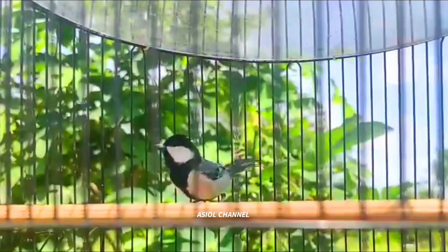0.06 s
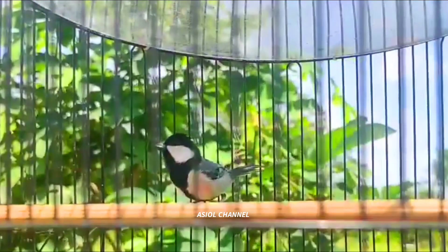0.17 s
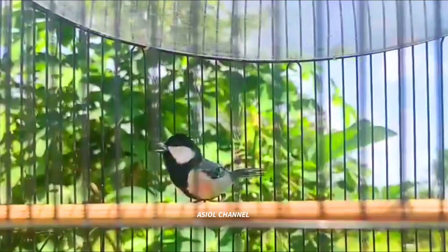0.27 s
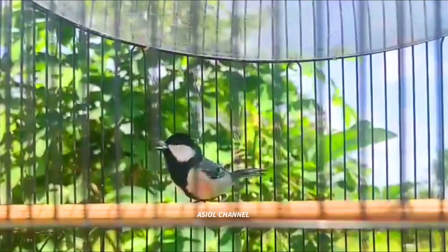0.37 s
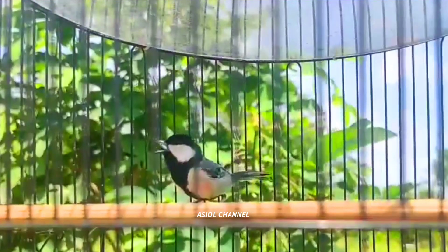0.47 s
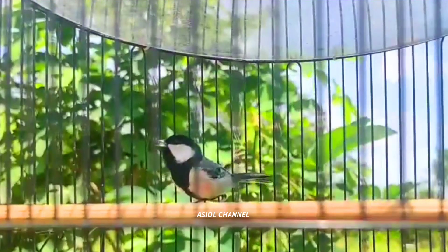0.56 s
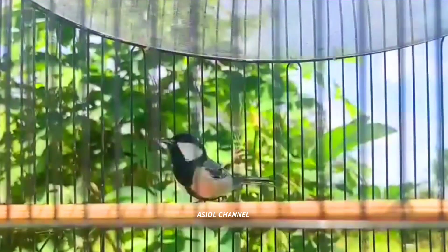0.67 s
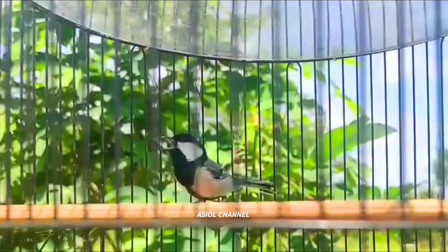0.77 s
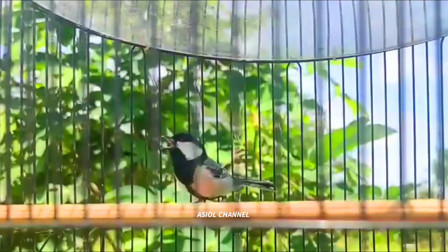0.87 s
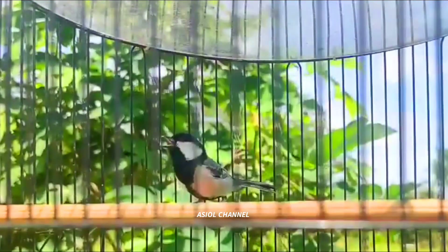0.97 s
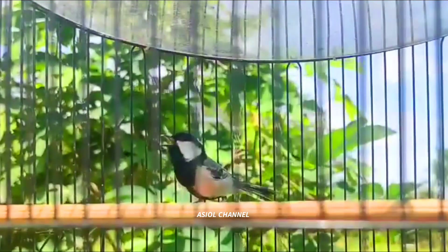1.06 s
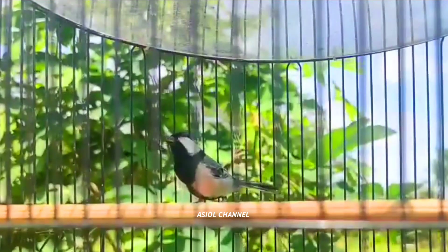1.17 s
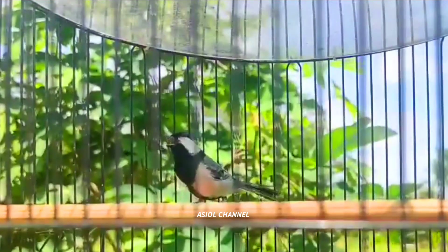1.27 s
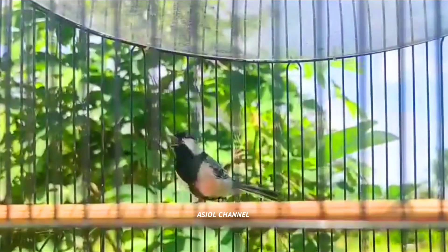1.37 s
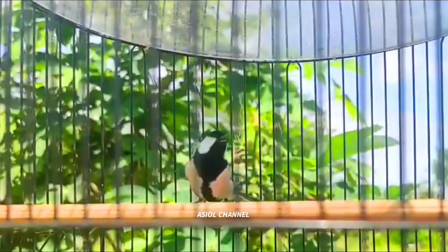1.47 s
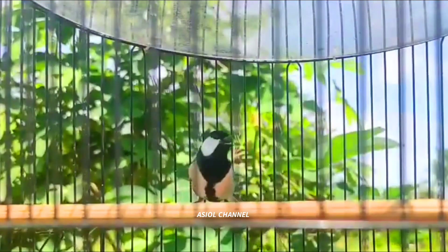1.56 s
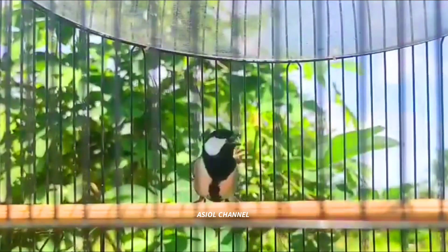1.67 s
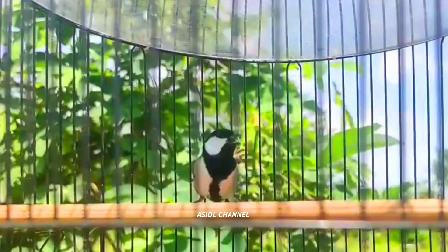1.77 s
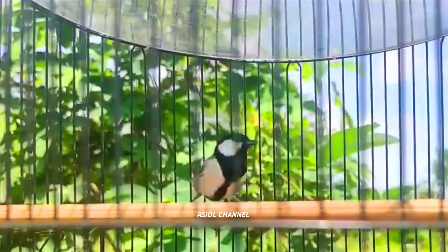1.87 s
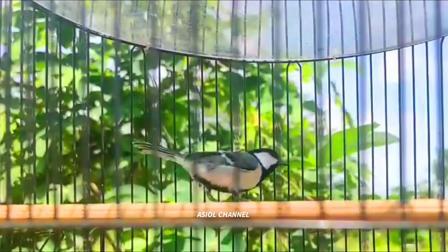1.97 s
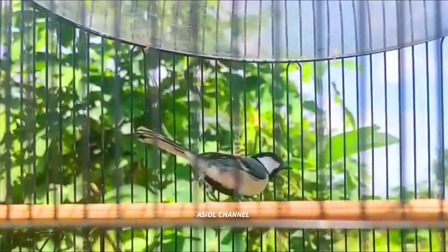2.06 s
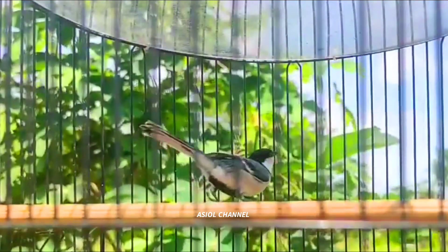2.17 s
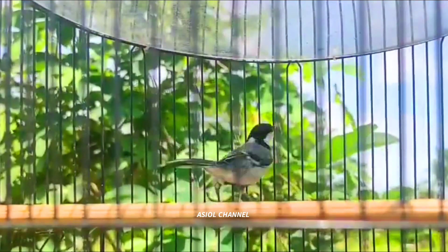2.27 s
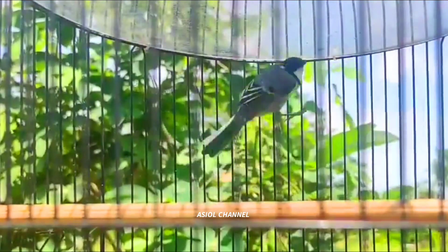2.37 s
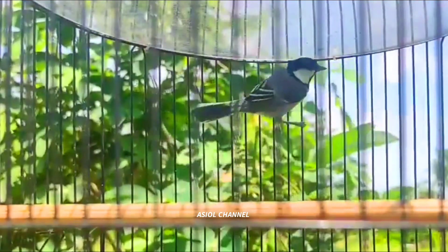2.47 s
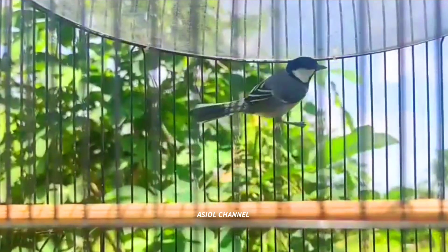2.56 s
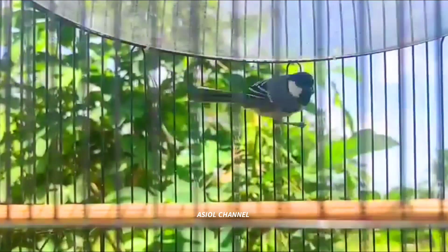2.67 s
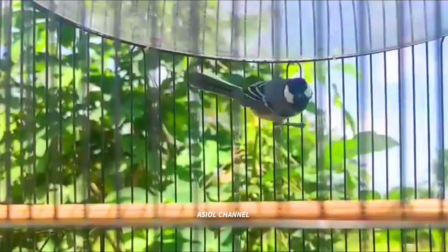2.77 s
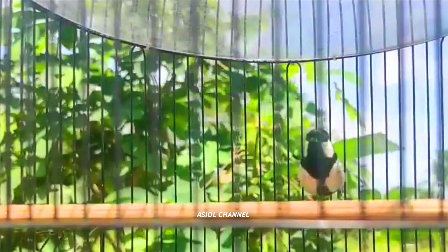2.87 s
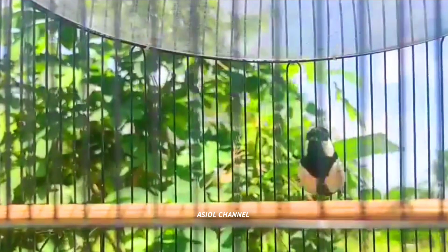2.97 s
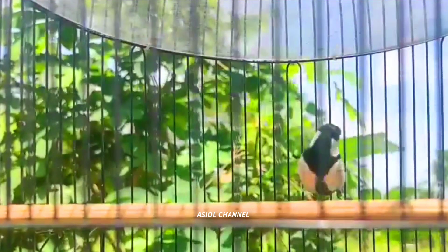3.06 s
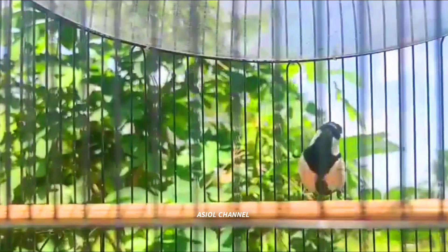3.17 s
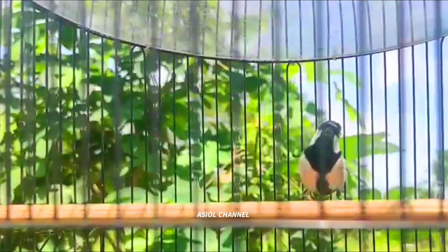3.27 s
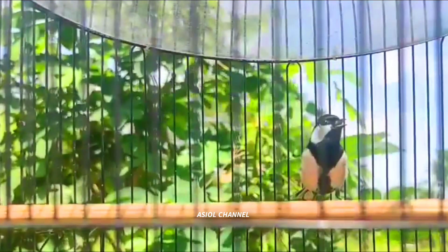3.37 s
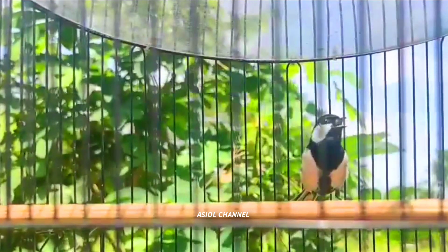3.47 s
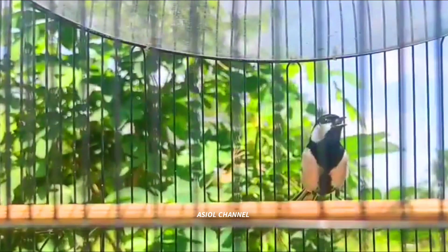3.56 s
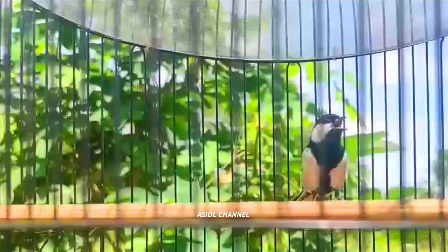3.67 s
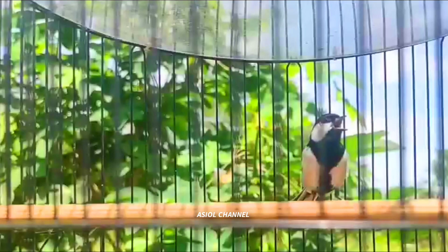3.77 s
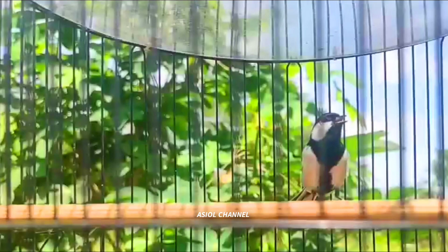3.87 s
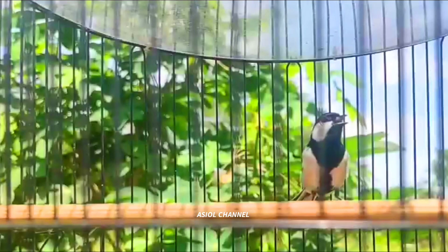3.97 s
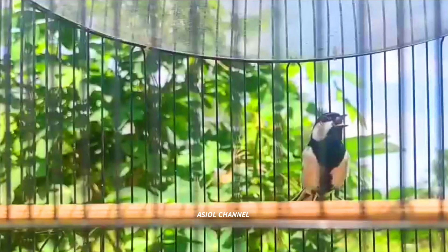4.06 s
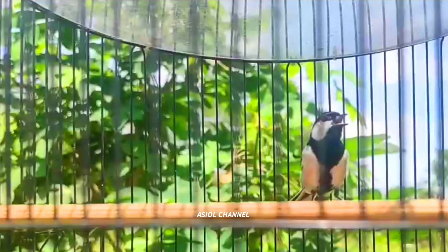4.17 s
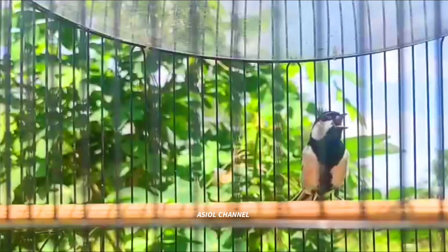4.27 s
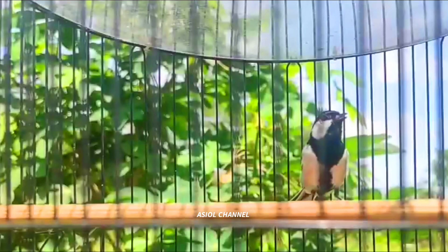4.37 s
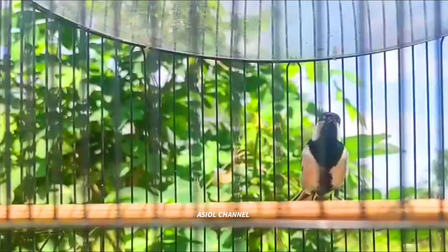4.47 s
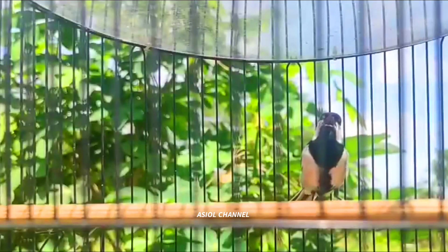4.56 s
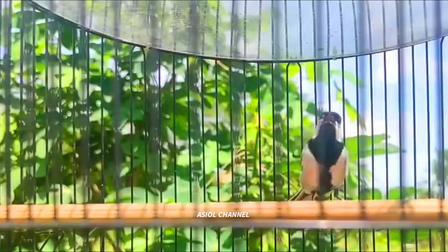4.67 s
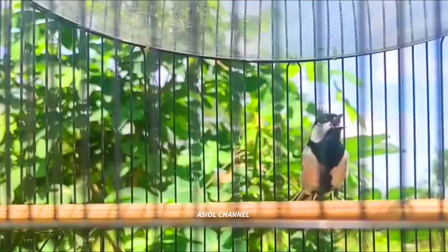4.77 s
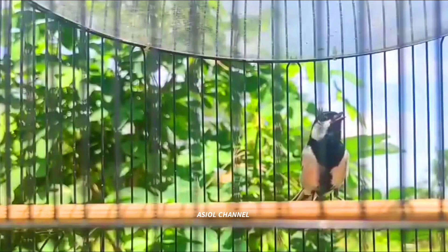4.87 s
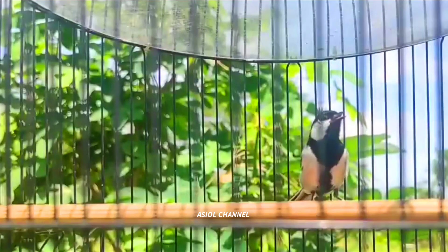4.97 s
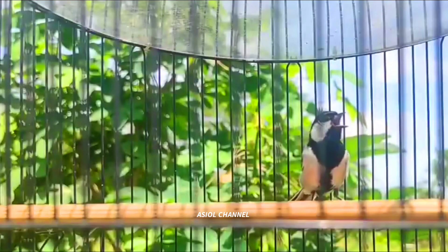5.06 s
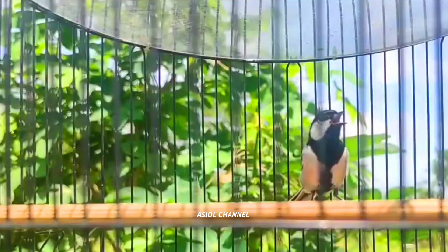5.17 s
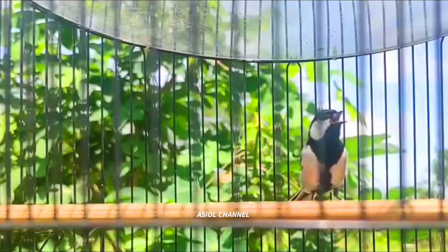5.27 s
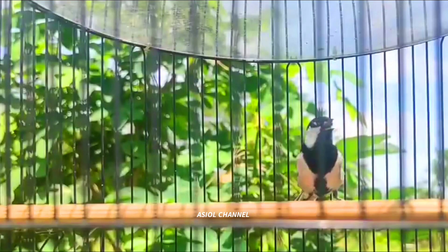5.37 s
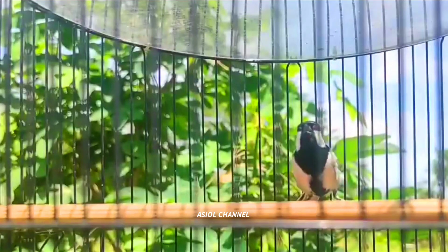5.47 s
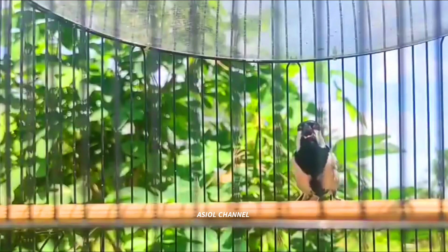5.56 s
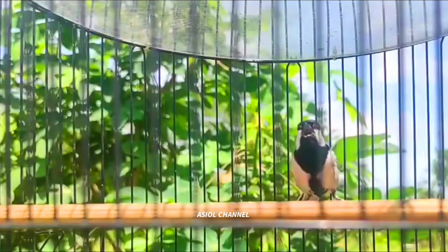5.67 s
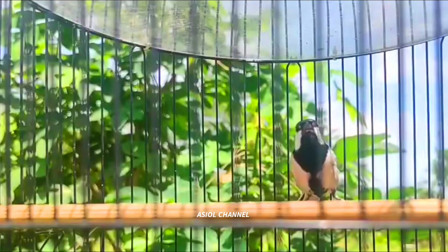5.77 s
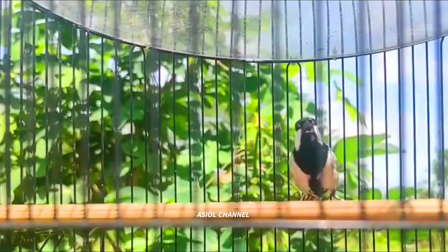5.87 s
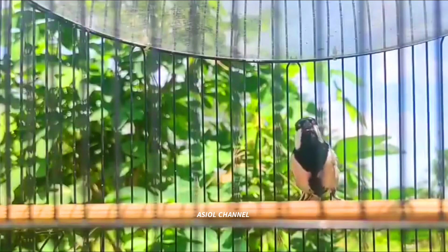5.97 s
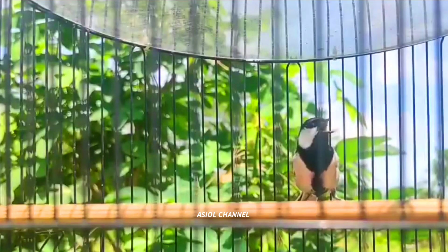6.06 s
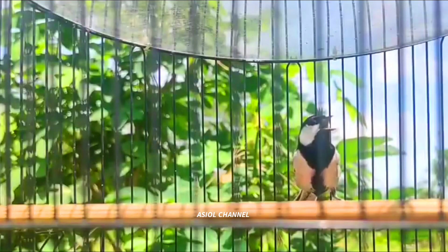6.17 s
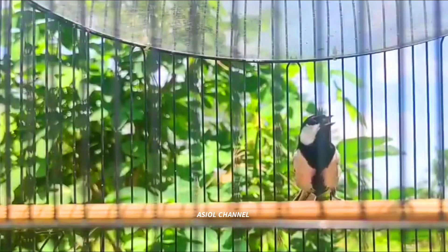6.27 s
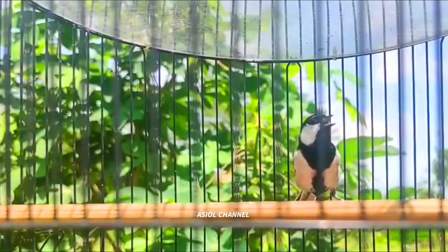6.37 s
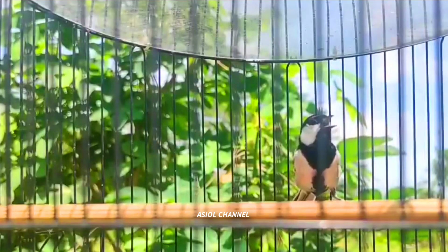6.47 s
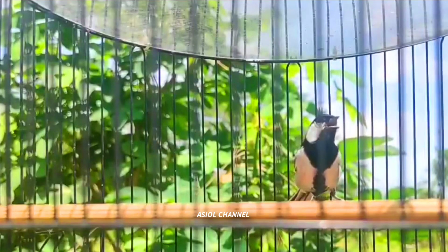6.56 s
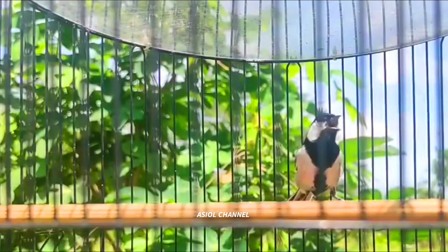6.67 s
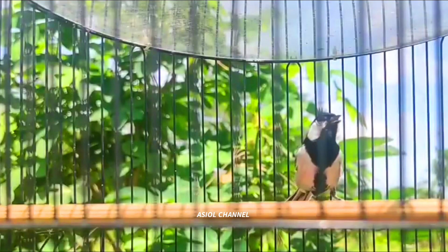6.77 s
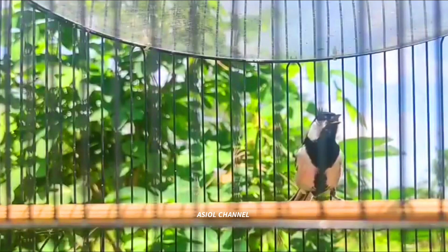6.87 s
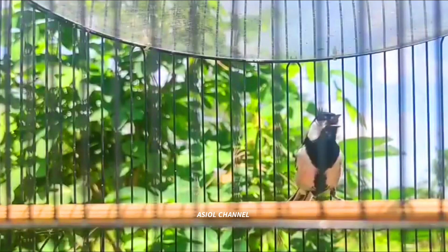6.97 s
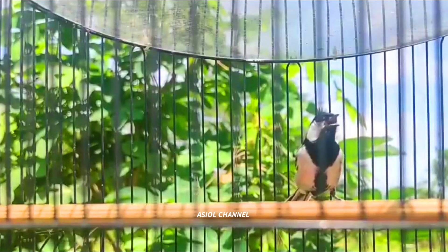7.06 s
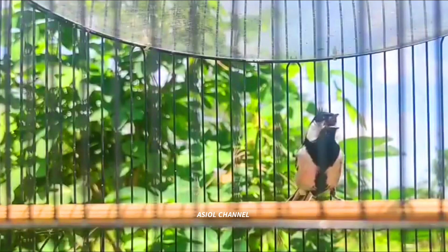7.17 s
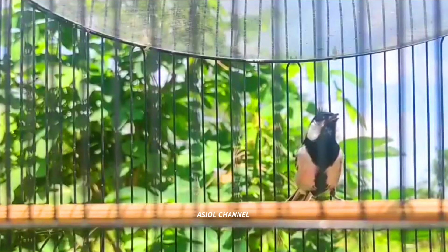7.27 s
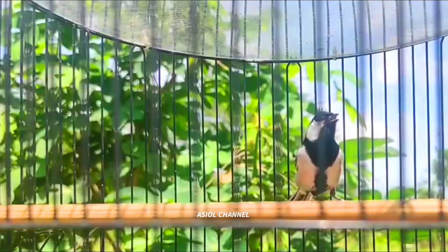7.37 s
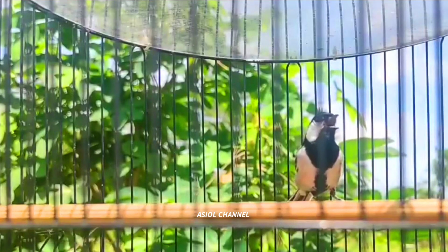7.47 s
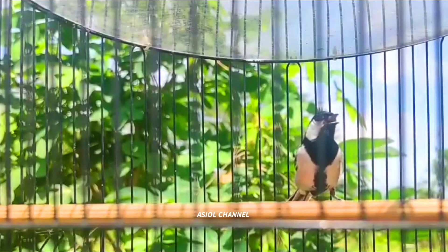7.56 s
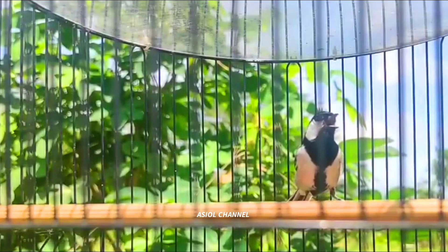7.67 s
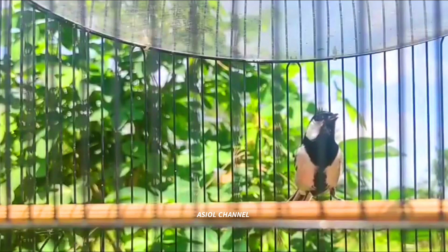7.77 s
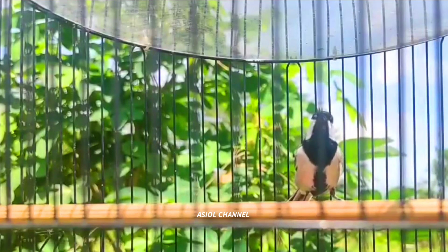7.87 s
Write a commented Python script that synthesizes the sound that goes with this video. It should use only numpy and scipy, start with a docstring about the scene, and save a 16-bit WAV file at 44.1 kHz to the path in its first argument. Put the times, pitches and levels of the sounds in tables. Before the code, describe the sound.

Close, bright tit song repeats a raspy upsweep, dipping whistle and high arched whistle, pausing midway for a quick hop in its wire cage.

```python
"""Caged tit singing in a quiet garden

Close to a stereo microphone, a tit in a wire cage sings two bursts of a three-note motif: a raspy upsweep,
a dipping whistle and a high arched whistle, each a gliding tone with weak overtones and filtered noise.
Between the bursts it hops: noise for claws and thud, wavering sines for the faintly ringing wires.
Nearby surfaces scatter a short noise-like tail behind every note; air, rumble and a whine lie far below."""
import sys
import numpy as np
from scipy import signal
from scipy.fft import rfft, irfft, next_fast_len
from scipy.io import wavfile
from scipy.ndimage import uniform_filter1d, minimum_filter1d

SR = 44100
rng = np.random.default_rng(int(sys.argv[2]) if len(sys.argv) > 2 else 0)


def file_out(sig):
    """Save sig as 16-bit WAV at sys.argv[1]."""
    # one column per channel
    cols = np.atleast_2d(sig).T
    # limit, then scale
    lim = np.clip(cols, -1, 1)
    pcm = np.round(lim * 32767).astype(np.int16)
    wavfile.write(sys.argv[1], SR, pcm)


N = 348390
TIME = np.arange(N) / SR
TOP_HZ = 15400  # upper edge of the sound


def undb(db):
    """Decibels to gain."""
    return 10 ** (np.asarray(db) / 20)


def unit(x):
    """Scale to rms 1."""
    return x / np.sqrt(np.mean(x ** 2))


def curve(rows):
    """Join rows of time in seconds and value by straight lines."""
    return np.interp(TIME, *np.transpose(rows))


def gain_at(hz, points):
    """Gain at the given frequencies of a spectrum drawn in Hz and dB."""
    point_hz, db = np.transpose(points)
    return undb(np.interp(np.log(hz + 1), np.log(point_hz), db))


def stereo_noise(points, likeness):
    """Noise coloured by a spectrum, scaled to rms 1, partly shared by the two channels."""
    own, shared = rng.standard_normal((2, N)), rng.standard_normal(N)
    common, size = np.clip(likeness, 0, 1), next_fast_len(N)
    white = np.sqrt(1 - common) * own + np.sqrt(common) * shared
    colour = gain_at(np.fft.rfftfreq(size, 1 / SR), points)
    return unit(irfft(rfft(white, size) * colour, size)[:, :N])


def waver(rate):
    """Smooth random motion of rms 1, averaged twice over 1 / rate seconds."""
    width = max(int(SR / rate), 2)
    smooth = uniform_filter1d(rng.standard_normal(N), width)
    return unit(uniform_filter1d(smooth, width))


# Spectrum of the still garden air. Each row: frequency in Hz, relative density in dB per Hz.
AIR_COLOUR = [(25, -9.5), (80, -10), (155, -3.5), (240, -13), (1000, -18), (3300, -18.5), (5000, -24.5),
              (9000, -22), (13600, -28.5), (15000, -41.5)]
# Level of the air around the microphone. Each row: time in seconds, level in dB.
AIR_LEVEL = [(0, -75.5), (1, -69.5), (2.2, -71), (2.7, -69.5), (3.2, -71), (7.9, -65)]


def still_air():
    """Broad, very quiet noise whose level drifts slowly."""
    return undb(curve(AIR_LEVEL) + 1.0 * waver(6)) * stereo_noise(AIR_COLOUR, 0.2)


# Spectrum of the low outdoor rumble. Each row: frequency in Hz, relative density in dB per Hz.
RUMBLE_COLOUR = [(25, -1), (70, 2), (170, -5.5), (300, -20.5), (800, -28), (3000, -42)]
# Level of the rumble at the microphone. Each row: time in seconds, level in dB.
RUMBLE_LEVEL = [(0, -98.5), (1.2, -69), (1.8, -61.5), (3.2, -73), (5, -65.5), (6, -71.5), (6.9, -64.5),
                (7.9, -65)]


def low_rumble():
    """Low-pitched noise that swells and sinks, with a quick unevenness in level."""
    return undb(curve(RUMBLE_LEVEL) + 2 * waver(44)) * stereo_noise(RUMBLE_COLOUR, 0.19)


# Spectrum of the faint whine. Each row: frequency in Hz, relative density in dB per Hz.
WHINE_COLOUR = [(3150, -50), (3340, -9.5), (3390, 8), (3440, 4.5), (3620, -58)]


def faint_whine():
    """A narrow band of noise, a little weaker over the first two seconds."""
    fade_in = curve([(0, 0.75), (2, 1), (7.9, 1)])
    return undb(-82) * stereo_noise(WHINE_COLOUR, 0.17) * fade_in


# Faint far tones at the opening. Each row: frequency in Hz, rms level in dB.
FAR_TONES = [(813, -90), (1620, -90.5)]


def far_tones():
    """Steady sines that fade out as the song begins."""
    tones = sum(undb(db) * np.sqrt(2) * np.sin(2 * np.pi * hz * TIME) for hz, db in FAR_TONES)
    return tones * curve([(.35, 1), (.6, 0)])


def garden():
    """The quiet place around the cage: air, rumble, whine and far tones."""
    return still_air() + low_rumble() + faint_whine() + far_tones()


# Ringing of the cage wires. Each row: frequency in Hz, relative level in dB.
CAGE_MODES = [(861, 2.5), (930, -6.5), (1340, -9), (1730, 3), (2270, -11), (2780, -7), (3370, -20)]
# Hops across the cage. Each row: start in seconds, scrape of the claws in dB, ring of the cage in dB.
HOPS = [(2.657, -58, -67), (2.714, -83, -61), (2.764, -84, -96), (3.06, -76, -81.5)]


def hops():
    """Claws scrape on the perch; the cage thuds and its loose wires rattle at their modes."""
    scrape_t60_s, thud_t60_s, wires_t60_s = 0.23, 0.43, .6  # times to die by 60 dB
    rise_s, thud_db = 0.0073, 1  # thud relative to the wires
    claws = stereo_noise([(300, 11.5), (2000, -3.5), (7000, 6.0), (13000, 3), (15000, -20)], 0.36)
    thud = stereo_noise([(100, 14), (400, 4.0), (900, 7), (2000, -5), (3200, -18), (6000, -27)], 0.43)
    wires = np.zeros((2, N))
    for hz, db in CAGE_MODES:
        phase = rng.uniform(0, 2 * np.pi, (2, 1))  # its own in each channel
        wires += undb(db) * waver(hz / 10) * np.sin(2 * np.pi * hz * TIME + phase)
    wires = unit(wires)
    out, t = np.zeros((2, N)), TIME[:SR]
    for start, scrape_db, ring_db in HOPS:
        span = slice(int(start * SR), int(start * SR) + SR)
        ring = undb(-60 * t / wires_t60_s) * wires[:, span]
        knock = undb(thud_db - 60 * t / thud_t60_s) * thud[:, span]
        scrape = undb(scrape_db - 60 * t / scrape_t60_s) * claws[:, span]
        out[:, span] += np.minimum(t / rise_s, 1) * (undb(ring_db) * (ring + knock) + scrape)
    return out


def scatter(x, db, t60, delay, treble_db):
    """A dense, dying spray of echoes, different at each channel; the overtones, beamed aside, feed it more."""
    t = TIME[:SR // 2]
    # silent up to the delay, full at twice the delay
    echoes = rng.standard_normal((2, len(t))) * undb(-60 * t / t60) * np.clip(t / delay - 1, 0, 1)
    echoes *= undb(db) / np.sqrt(np.sum(echoes ** 2, axis=1, keepdims=True))
    colour = [(7500, 5), (9300, 6.5), (10300, treble_db), (14000, treble_db), (15000, -9.5)]
    tilt = gain_at(np.fft.rfftfreq(len(t), 1 / SR), colour)
    return signal.fftconvolve(x, irfft(rfft(echoes) * tilt, len(t)), axes=1)[:, :N]


# Turned away from the microphone, the bird lights up the cage more.
# Each row: time in seconds, extra echo in dB.
TURNED_AWAY = [(.4, -1.5), (.9, -5.5), (1.6, 0.5), (1.85, -1), (2.1, -4.5), (3.4, -6), (3.9, -5),
               (7.9, -10)]


def surroundings(voice):
    """Wires and floor of the cage answer at once, the surroundings later and more softly."""
    aside = voice * undb(curve(TURNED_AWAY))
    cage = scatter(aside, db=-17.0, t60=.06, delay=.0035, treble_db=13.5)
    yard = scatter(aside, db=-33, t60=.13, delay=.008, treble_db=7)
    far = scatter(aside, db=-54, t60=1.0, delay=.03, treble_db=-7)
    return cage + yard + far


# How the throat carries the tone: sweeps start faint below its range, arches go hollow above it.
# Each row: frequency in Hz, gain in dB.
THROAT_COLOUR = [(3300, -20.5), (3800, -8.5), (4200, -0.5), (4850, -0.5), (5600, 2), (6850, -1),
                 (7450, -7.5), (8200, -23)]
# What throat and beak let through of the overtones. Each row: frequency in Hz, gain in dB.
OVERTONE_COLOUR = [(6500, 1.5), (8000, 0), (8900, -32.5), (9500, -12.5), (10200, -3.5), (12000, 2),
                   (13300, 3.5), (14200, -0.5), (14900, -34)]
# Where the bird points its beak. Each row: time in seconds, left minus right in dB before each note kind's aim.
FACING = [(.4, -1.5), (1.35, -3), (2, -1), (3.5, -1.5), (5.3, 1.1), (7, 1.3), (7.8, -2.5)]
# Where it sits on the perch. Each row: time in seconds, lead of the left channel in ms.
PERCH = [(.5, .01), (.9, .04), (1.65, .04), (1.8, -.08), (2.1, -.08), (3.3, -.01), (7.9, -.01)]
# every note rises from the onset and sinks to the ending, relative to its full level
ONSET_DB, ENDING_DB = -32.5, -21


def sing(melody, notes, jitter, haze, shimmer_db, second_db, third_db, attack_s, release_s, aim_db, smear):
    """A gliding, nearly pure tone with weak overtones; returns the voice and the effort behind it."""
    voice, effort = np.zeros((2, N)), np.zeros(N)
    tremor, flutter = jitter * waver(990), shimmer_db * waver(190)
    # the moving beak throws the sound a little left and right
    pan_db = curve(FACING) + aim_db + 1.5 * waver(70)
    lead_s = curve(PERCH) / 10 ** 3
    skew = smear * waver(60)  # radians by which left and right drift apart, widening the note
    # overtones come and go, and a haze of noise clings to them
    flicker, fuzz = undb(7.95 * waver(33)), haze * np.array([waver(2200), waver(2200)])
    sides = np.array([[.5], [-.5]])  # left, right
    for start, length, ratio, db, swell_db in notes:
        span = slice(int(start * SR), min(int((start + length) * SR), N))
        t = TIME[span] - start
        share = t / length
        glide = ratio * uniform_filter1d(np.interp(share, *np.transpose(melody)), size=200)
        # the pitch is least steady where it moves fastest
        speed = np.abs(np.gradient(glide))
        hz = glide * (1 + tremor[span] * np.sqrt(speed / (speed.mean() + 1e-9)))
        gate = np.clip(t / 0.0015, 0, 1) * np.clip((length - t) / 0.0025, 0, 1)
        attack_db = ONSET_DB * np.exp(-t / attack_s)
        release_db = ENDING_DB * np.exp((t - length) / release_s)
        envelope_db = attack_db + swell_db * (share - .5) + release_db
        loud = undb(db + envelope_db + flutter[span]) * gain_at(glide, THROAT_COLOUR)
        apart = sides * (2 * np.pi * hz * lead_s[span] + skew[span])
        phase = 2 * np.pi * np.cumsum(hz) / SR + apart
        # the throat is tuned to the fundamental, so overtones and rasp swell less than it does
        drive = loud ** 0.29
        second = undb(second_db) * gain_at(2 * hz, OVERTONE_COLOUR) * np.sin(2 * phase)
        third = undb(third_db) * gain_at(3 * hz, OVERTONE_COLOUR) * np.sin(3 * phase)
        third *= 3 * hz < TOP_HZ
        overtones = drive * (flicker[span] + fuzz[:, span]) * (second + third)
        voice[:, span] += gate * undb(sides * pan_db[span]) * (loud * np.sin(phase) + overtones)
        effort[span] += gate * drive
    return voice, uniform_filter1d(effort, size=1100)


JITTER, HAZE = .003, .7  # basic pitch unsteadiness as a fraction; strength of the noise on the overtones

# The upsweeps. Each row: start in seconds, length in seconds, pitch ratio, level in dB before
# envelope and throat, swell from start to end in dB.
SWEEPS = [(0.3712, 0.044, 1.01, -8.5, -3.5), (0.8372, 0.064, 0.99, -2.95, 0), (1.325, 0.062, 1, -2.7, 0.5),
          (1.7933, 0.067, 0.99, -4, -21), (3.7216, 0.06, 0.99, -0.1, 0.5),
          (4.1924, 0.065, 1.008, 1.5, -3.5), (4.6732, 0.062, 1.007, 1.9, -6),
          (5.1533, 0.062, 0.99, 2.5, -4), (5.6367, 0.0564, 0.98, 2, -3), (6.1201, 0.059, 1.006, 4, -4.5),
          (6.5996, 0.061, 1.003, 3.2, -7), (7.0819, 0.066, 1.012, 5.6, -18.5),
          (7.5689, 0.066, 1.015, 0.4, -8)]
# Melody of an upsweep. Each row: share of its length from 0 to 1, pitch in Hz before the note's ratio.
SWEEP_PITCH = [(0, 3330), (.47, 3830), (.7, 4270), (.78, 4600), (.94, 6050), (1, 6500)]
# How strained the voice is. Each row: time in seconds, strain factor.
SWEEP_STRAIN = [(.4, 1.3), (.87, 3), (1.35, 2.3), (1.83, 3), (3.75, 1), (6.65, 1.1), (7.12, 3.2),
                (7.6, 1.1)]


def upsweeps():
    """Rising notes; a strained sweep wobbles in pitch and breaks up in level."""
    strain = curve(SWEEP_STRAIN)
    return sing(SWEEP_PITCH, SWEEPS, 2 * JITTER * strain, HAZE, shimmer_db=2.7 * strain ** 0.42,
                second_db=-40, third_db=-43, attack_s=0.019, release_s=.007, aim_db=1, smear=0.49 * strain)


# The dipping whistles. Each row: start in seconds, length in seconds, pitch ratio, level in dB before
# envelope and throat, swell from start to end in dB.
DIPS = [(0.4945, 0.11, 1.004, -14.5, 15), (0.9702, 0.12, 1.008, -11.5, 13), (1.4538, 0.11, 1.015, -10, 3),
        (1.929, 0.12, 0.99, -9, -2.5), (3.3715, 0.11, 0.98, -17.5, 9), (3.8533, 0.11, 0.993, -5, 4.5),
        (4.329, 0.11, 1, -6.5, 3.5), (4.8033, 0.12, 1.007, -5, -0.5), (5.2861, 0.12, 1, -6, 0),
        (5.7648, 0.12, 0.9996, -7.5, 4.5), (6.2516, 0.12, 1, -8.5, 4.5), (6.7334, 0.12, 0.99, -6.5, 6.5),
        (7.2189, 0.12, 1.0005, -6.5, 6), (7.7041, 0.12, 1.002, -7, 6)]
# Melody of a dip. Each row: share of its length from 0 to 1, pitch in Hz before the note's ratio.
DIP_PITCH = [(0, 5700), (.12, 6040), (.35, 5080), (.48, 4820), (.6, 4860), (.72, 5380), (.945, 6640),
             (1, 5750)]


def dipping_whistles():
    """Notes with the steadiest pitch: a clean tone that sinks and climbs again."""
    return sing(DIP_PITCH, DIPS, JITTER / 2, HAZE, shimmer_db=1.5, second_db=-44.0, third_db=-79,
                attack_s=0.0079, release_s=0.0043, aim_db=0.5, smear=.25)


# The arched whistles. Each row: start in seconds, length in seconds, pitch ratio, level in dB before
# envelope and throat, swell from start to end in dB.
ARCHES = [(0.6724, 0.093, 1.008, -8.5, 4), (1.1513, 0.093, 1.011, -2, 5), (1.6356, 0.086, 1.018, -7.5, 1.5),
          (3.5498, 0.091, 1.022, -10, 11), (4.0303, 0.091, 1.0085, -4, 9),
          (4.5078, 0.091, 1.009, -6.0, 9.5), (4.9873, 0.091, 1.02, -4, 16.5),
          (5.4683, 0.095, 1.019, -8.5, 5.5), (5.952, 0.096, 0.994, -9, 2.5),
          (6.4373, 0.093, 1.006, -7.5, 7), (6.9194, 0.093, 0.99, -5, 0), (7.4021, 0.098, 0.99, -3, 1.5),
          (7.89, 0.096, 1, -11, 6)]
# Melody of an arch. Each row: share of its length from 0 to 1, pitch in Hz before the note's ratio.
ARCH_PITCH = [(0, 6300), (.17, 6880), (.34, 8100), (.44, 8150), (.62, 7130), (.78, 6700), (.95, 6530),
              (1, 5950)]


def arched_whistles():
    """High notes that leap up and fall back, with the quickest attack."""
    return sing(ARCH_PITCH, ARCHES, JITTER, HAZE, shimmer_db=1.0, second_db=-43.5, third_db=-80,
                attack_s=0.0047, release_s=0.004, aim_db=1.5, smear=.3)


def starts(notes):
    """A 20 ms swell around the start of each note, larger for louder notes."""
    at, db = np.array(notes)[:, 0], np.array(notes)[:, 3]
    marks = np.zeros(N)
    marks[np.minimum((at * SR).astype(int), N - 1)] = undb(db / 2)
    # centred 5 ms after the start
    return signal.fftconvolve(marks, np.hanning(SR // 50))[SR // 200:][:N]


# Rasp of the sweeps. Each row: frequency in Hz, relative density in dB per Hz.
RASP_COLOUR = [(200, -17.5), (600, -17), (1500, -12.5), (2900, -11), (3800, 5), (6000, 3), (8200, -3.5),
               (8900, -31.5), (9600, -24), (10500, -10), (13800, -12), (14900, -33.5)]
# Faint hiss of the whistles. Each row: frequency in Hz, relative density in dB per Hz.
HISS_COLOUR = [(1000, -32), (3200, -21), (4700, -6.5), (6500, 4), (8200, -9), (9000, -33.5), (12000, -24),
               (13500, -13.5), (14900, -37.5)]


def rasp_and_hiss(sweep_effort, arch_effort):
    """Grainy noise: rasp follows the sweeps' effort, hiss the arches', and both swell around note starts."""
    rasp_level = undb(-37.5) * sweep_effort + undb(-53.5) * starts(SWEEPS)
    rasp = rasp_level * stereo_noise(RASP_COLOUR, 0.5)
    # a short soft hiss around the start of each whistle
    start_hiss = undb(-43.5) * starts(DIPS) + undb(-50) * starts(ARCHES)
    hiss = (start_hiss + undb(-50) * arch_effort) * stereo_noise(HISS_COLOUR, 0.93)
    return (rasp + hiss) * undb(2.5 * waver(200))


# Low rustle that comes with the notes. Each row: frequency in Hz, relative density in dB per Hz.
RUSTLE_COLOUR = [(25, -4), (70, 0), (170, -3.5), (300, -10.5), (800, -13), (2500, -21), (5000, -48)]


def rustle(sweep_effort, dip_effort, arch_effort):
    """Low noise that follows the effort of all three notes, slowly uneven in level."""
    level = undb(-62.5) * sweep_effort + undb(-64.5) * dip_effort + undb(-55.5) * arch_effort
    return level * stereo_noise(RUSTLE_COLOUR, 0.15) * undb(3 * waver(8))


def song():
    """The three notes with their rasp, hiss, rustle and echoes."""
    sweep, sweep_effort = upsweeps()
    dip, dip_effort = dipping_whistles()
    arch, arch_effort = arched_whistles()
    voice = sweep + dip + arch + rasp_and_hiss(sweep_effort, arch_effort)
    return voice + surroundings(voice) + rustle(sweep_effort, dip_effort, arch_effort)


def scene():
    """The garden, the cage and the bird."""
    return garden() + hops() + song()


def record(dry):
    """A smooth limiter holds down the loudest notes; a steep low-pass cuts the top."""
    ceiling = 0.75
    need = np.minimum(1, ceiling / (np.abs(dry).max(axis=0) + 1e-9))
    held = minimum_filter1d(need, size=300)
    gain = uniform_filter1d(uniform_filter1d(held, size=150), size=150)
    low_pass = signal.ellip(8, .2, 70, TOP_HZ, fs=SR, output="sos")
    return signal.sosfilt(low_pass, dry * gain)


dry = scene()
out = record(dry)
file_out(out)
```